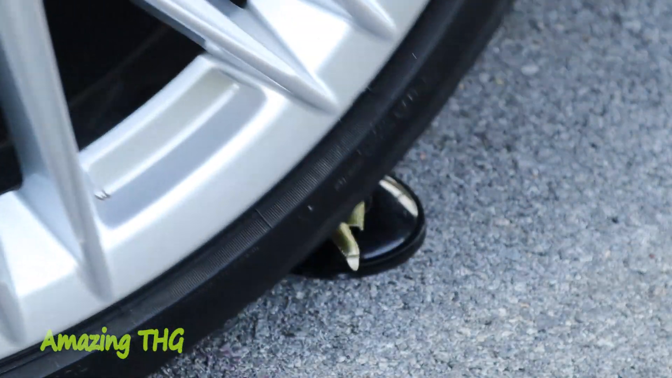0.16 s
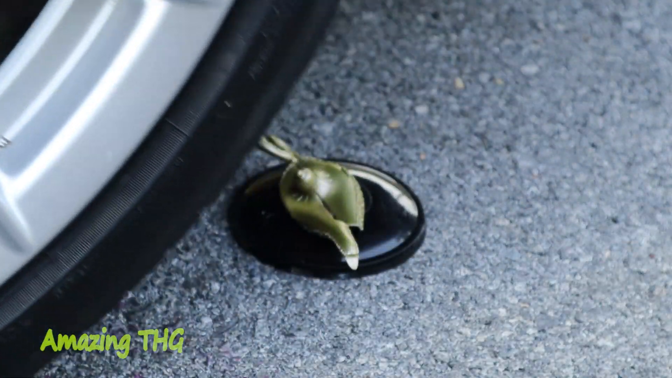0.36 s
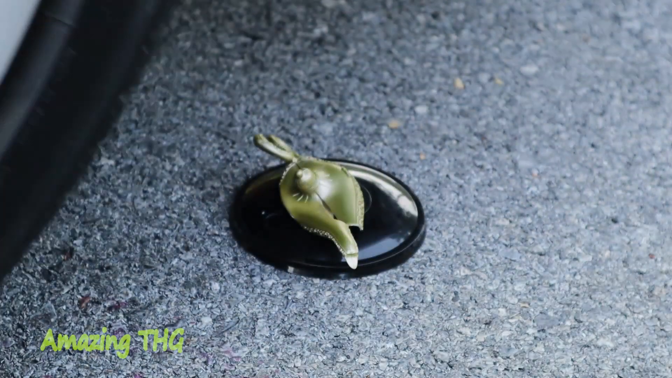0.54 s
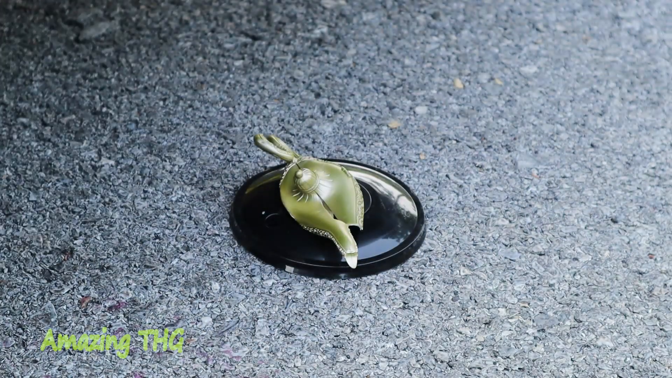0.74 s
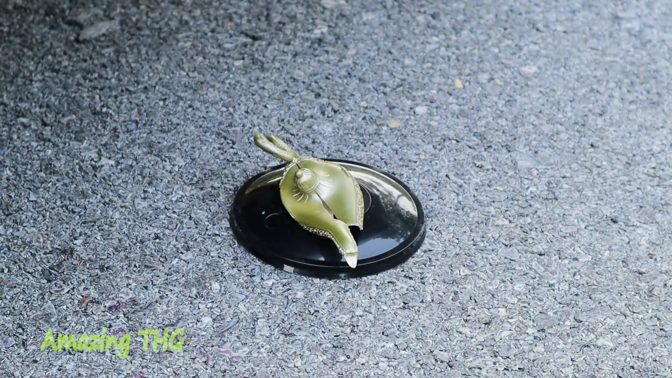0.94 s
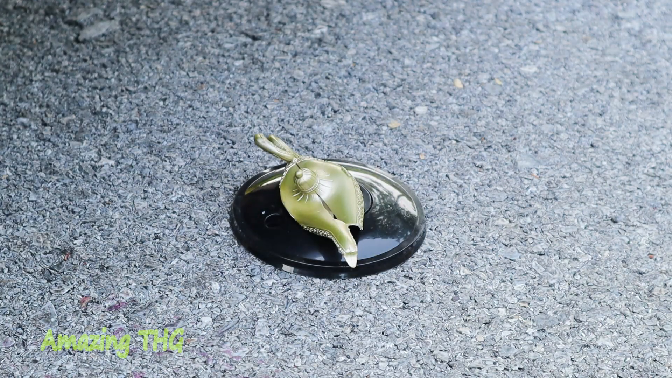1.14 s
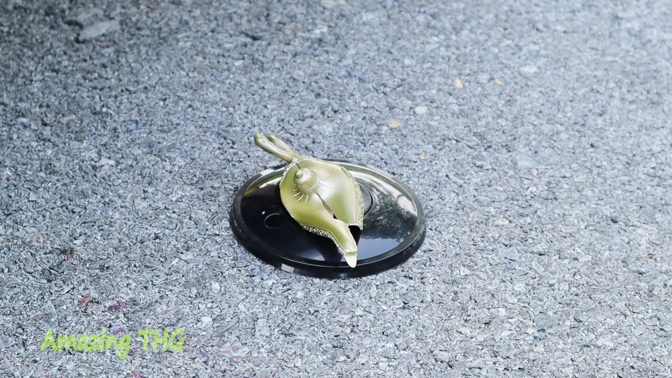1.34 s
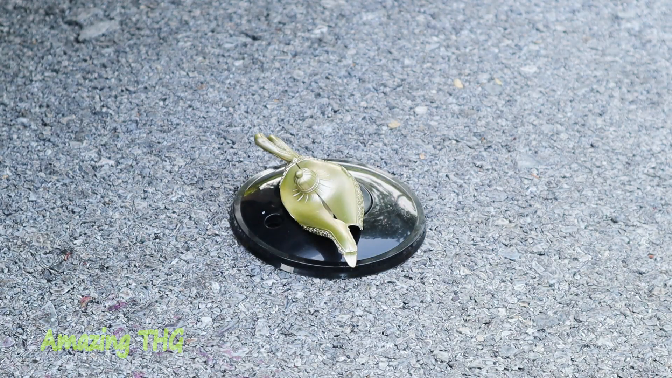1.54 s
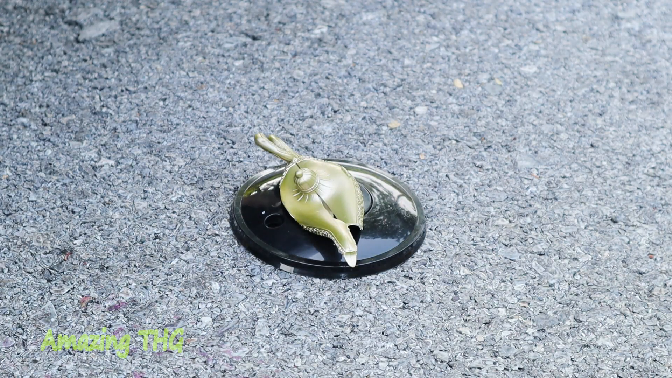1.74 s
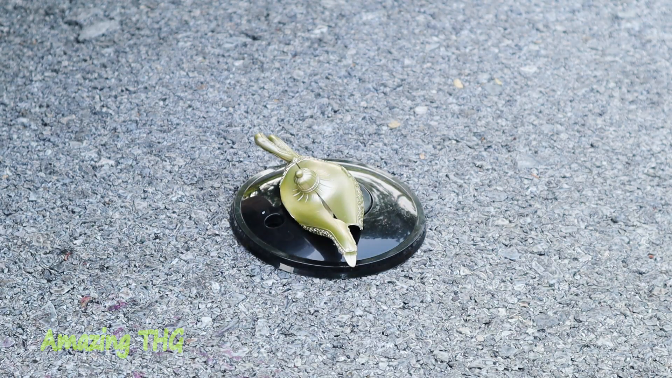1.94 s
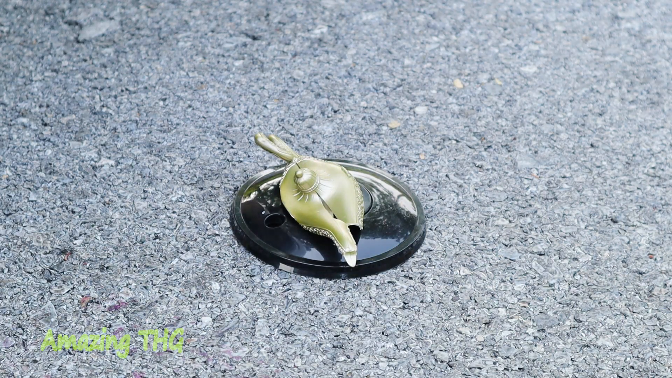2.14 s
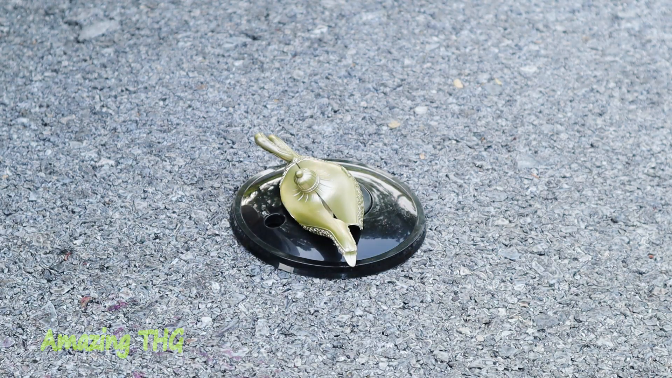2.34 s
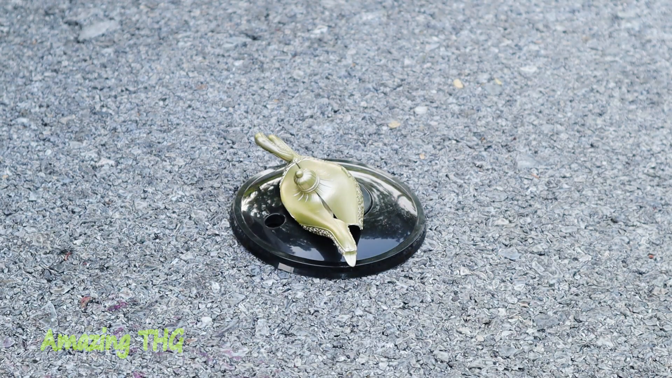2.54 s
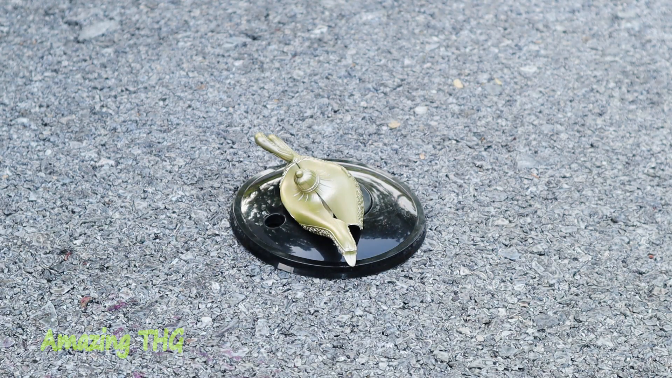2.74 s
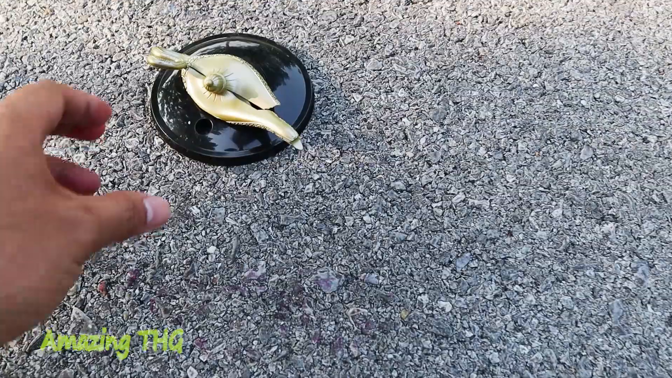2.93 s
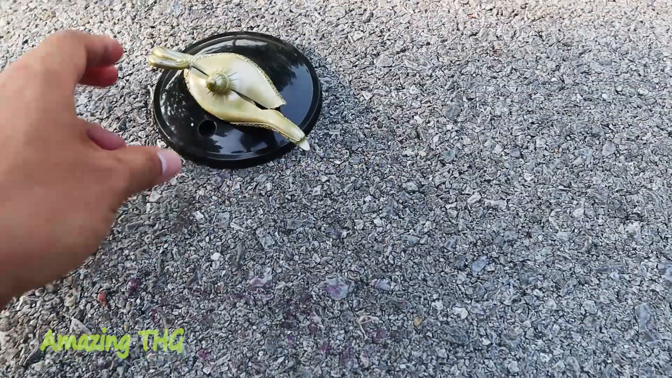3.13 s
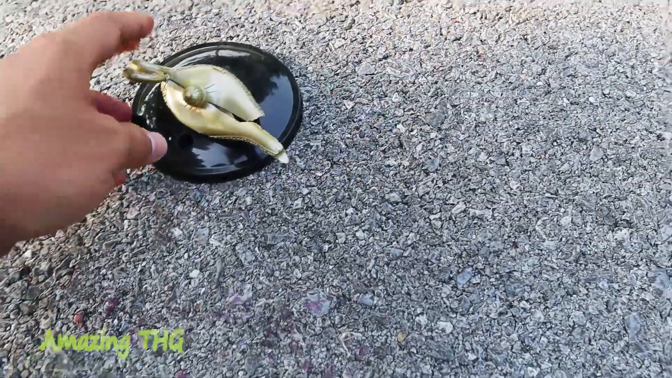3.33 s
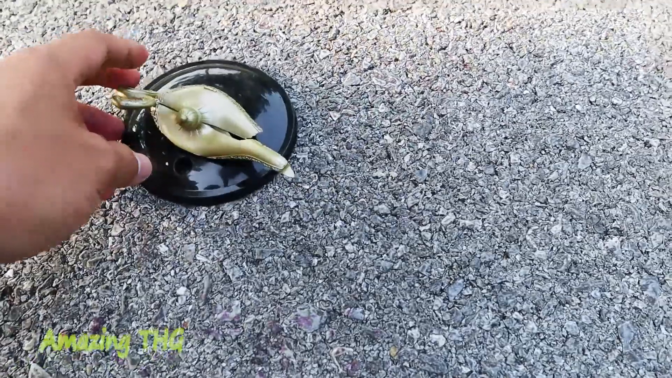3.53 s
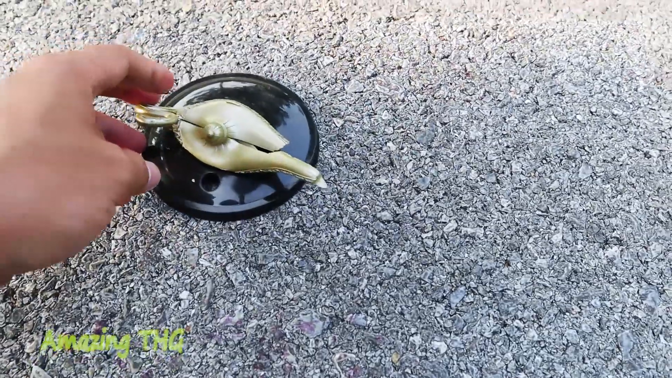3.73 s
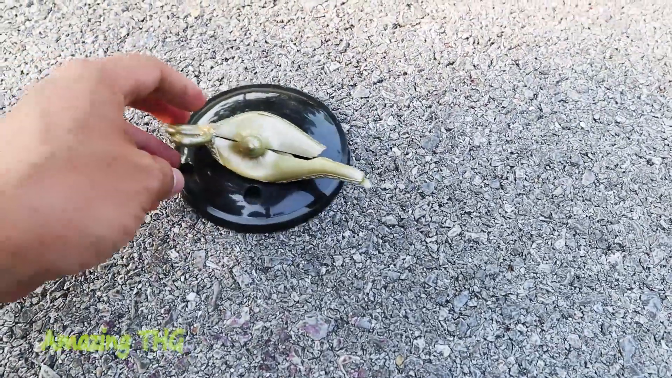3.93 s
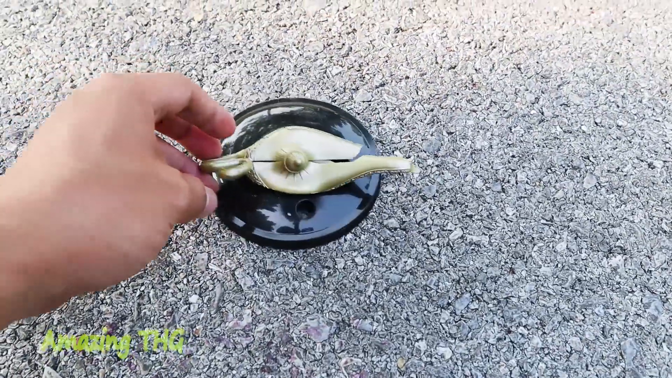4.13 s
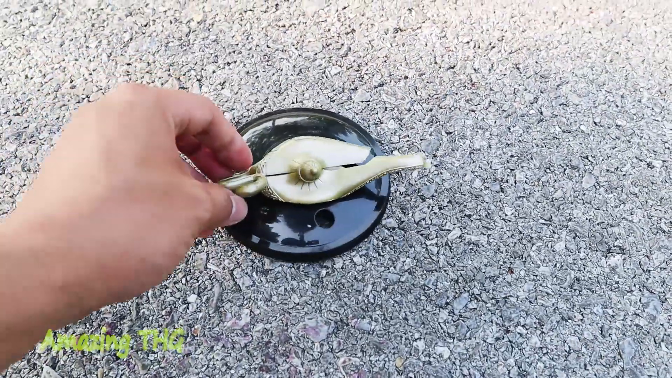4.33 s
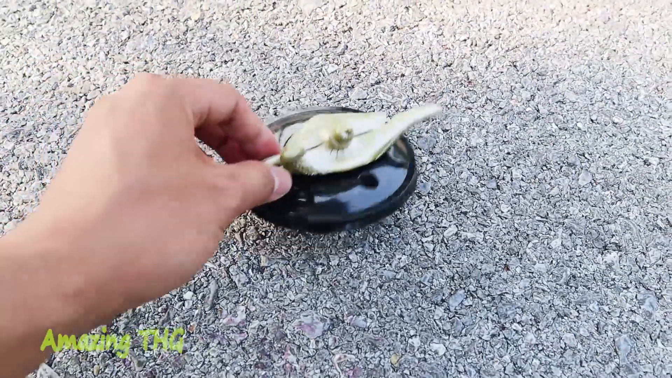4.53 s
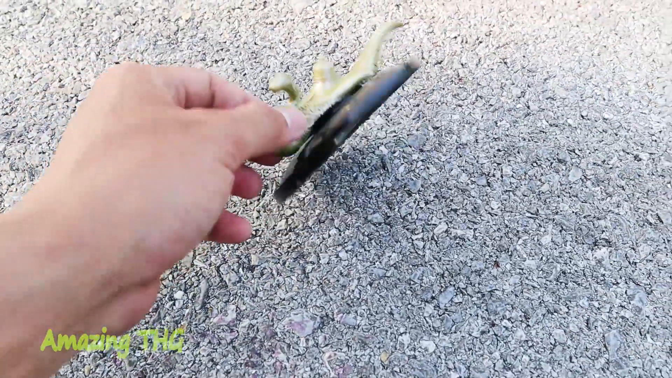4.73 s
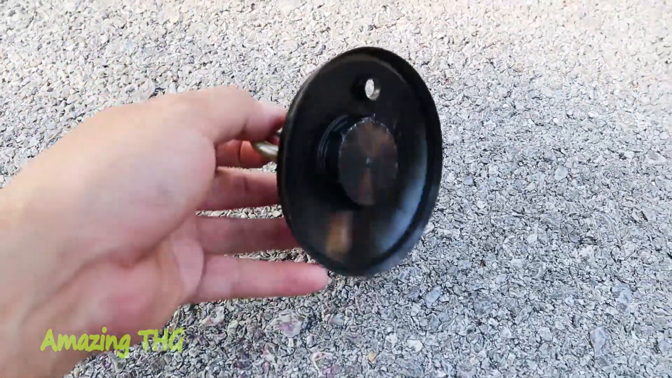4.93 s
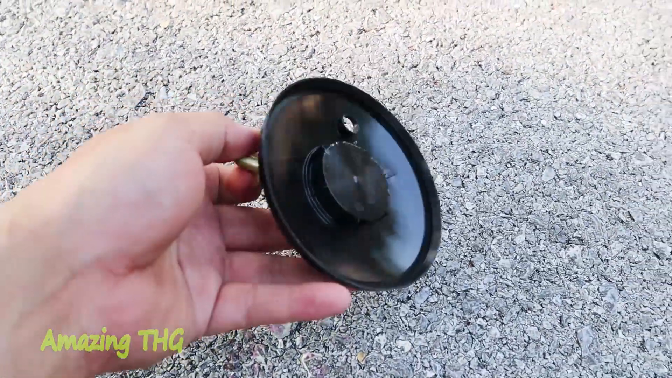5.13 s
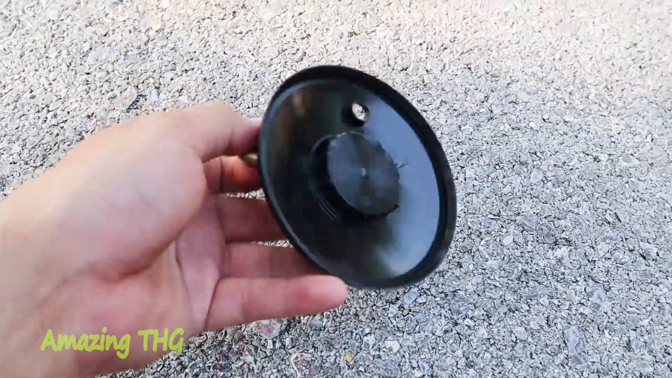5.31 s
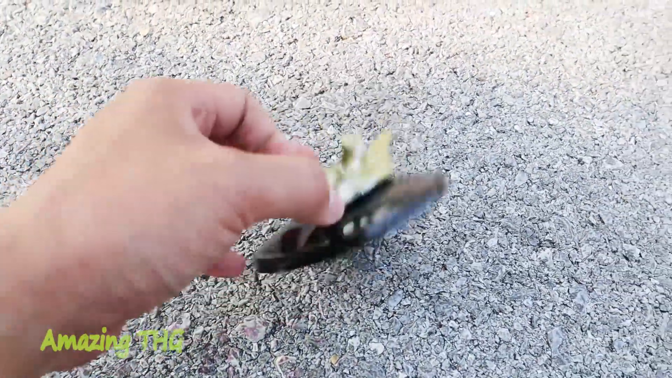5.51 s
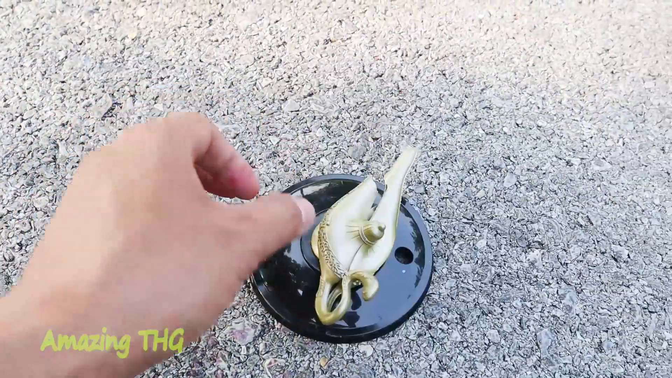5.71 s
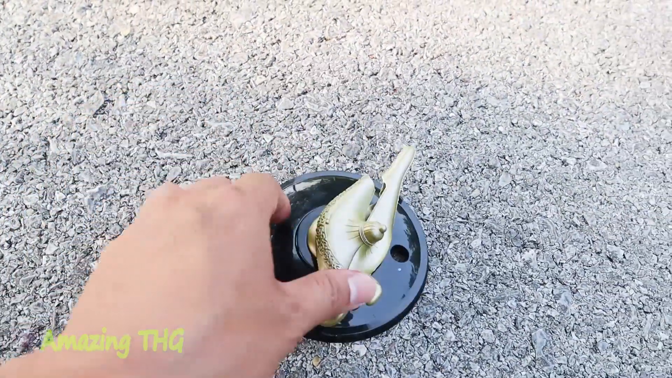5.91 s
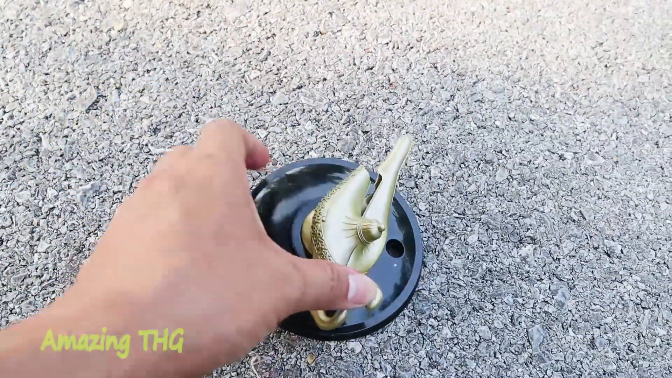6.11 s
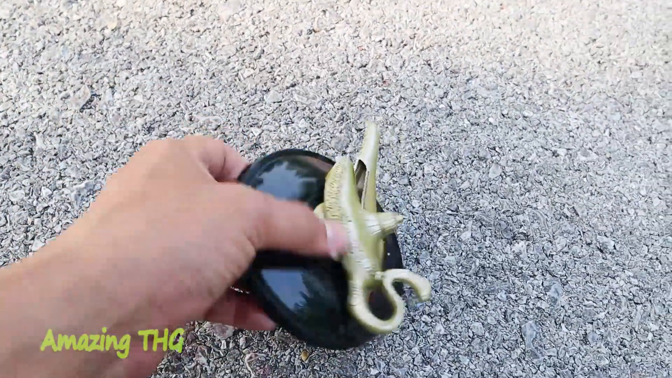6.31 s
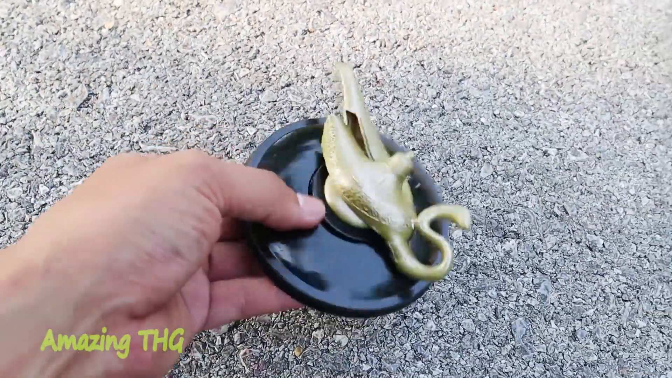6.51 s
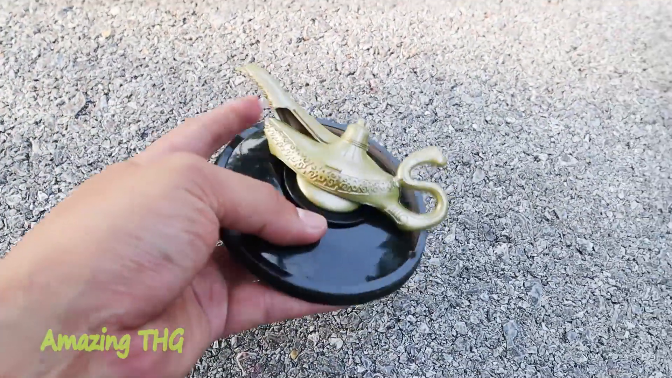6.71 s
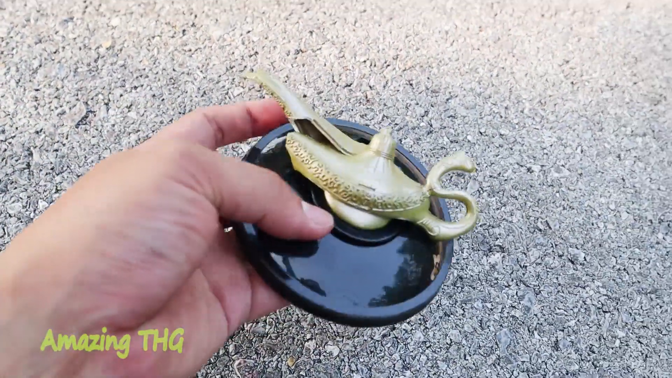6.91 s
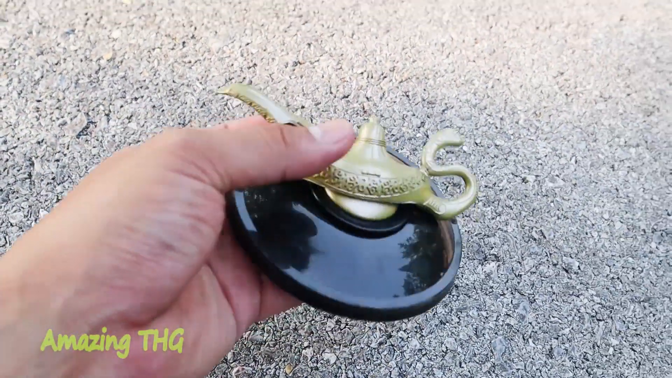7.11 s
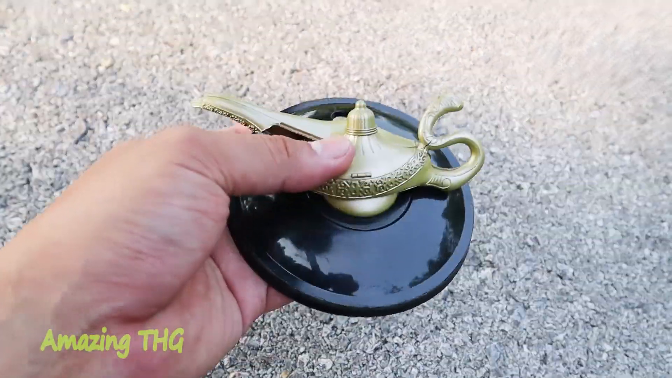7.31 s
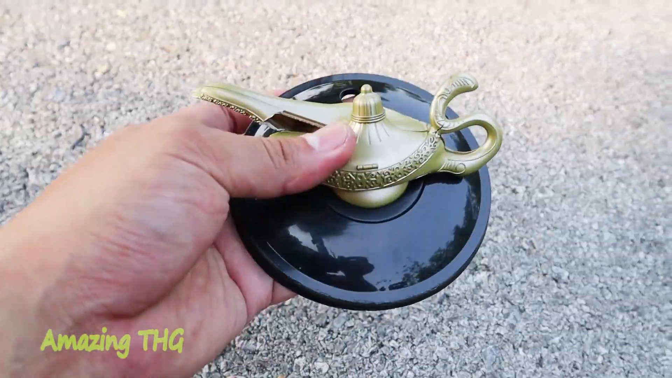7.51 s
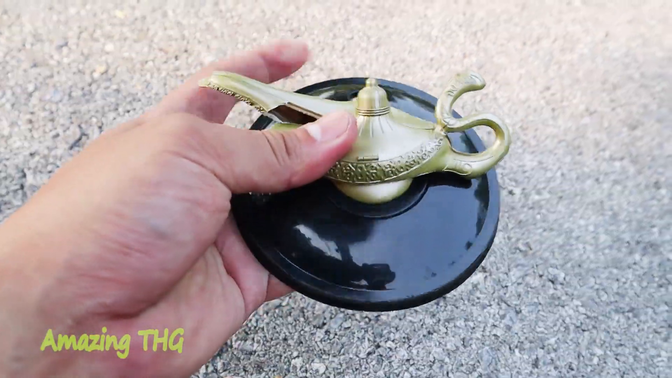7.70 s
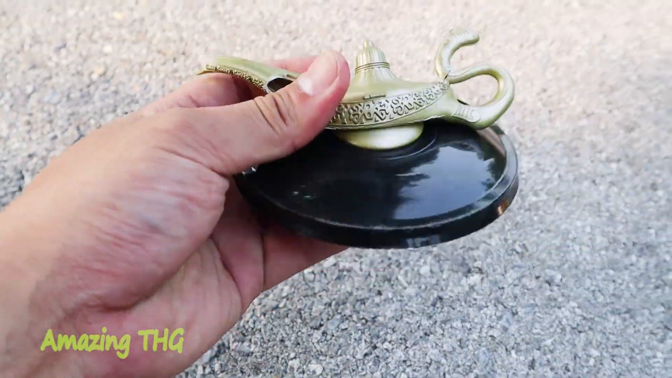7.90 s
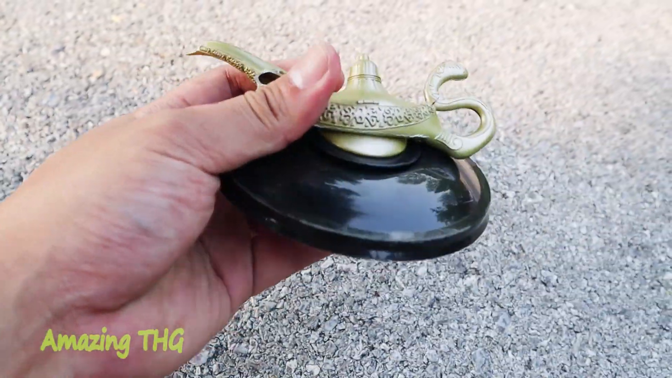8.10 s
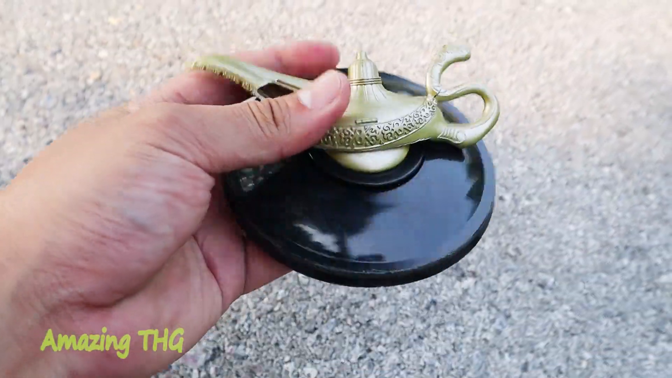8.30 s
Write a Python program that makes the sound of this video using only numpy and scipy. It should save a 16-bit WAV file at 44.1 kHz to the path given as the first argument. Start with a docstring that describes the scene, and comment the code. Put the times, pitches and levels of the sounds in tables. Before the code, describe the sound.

Outdoors on asphalt, heard close and dry. A small strained click opens, and at about 0.13 s a pinned plastic base snaps free with a very loud, sharp crack and short echo, rattling out by 0.25 s. Low-level tyre noise recedes while a soft engine idle chugs about 24 times a second with faint hum and whine, cutting abruptly near 3 s. Only faint airy hiss remains. A tick at 3.45 s begins uneven gritty scrapes and hollow knocks until 4.55 s, then brighter edge skips as the toy lifts, ending around 4.85 s. After a quiet pause, two clacks at 5.63 s precede the loudest hit at 5.7 s, with rapid shrinking bounces. Brief knocks and scraping come at 5.97 and 6.2-6.4 s. Soft skin rubs, tiny squeaks and sparse clicks follow, the clearest a bright double click at 7.79 s, then a small chirp at 7.95 s and a last faint tick at 8.33 s.

```python
"""A plastic toy lamp's lid-shaped base snaps free from under a car tyre and rattles; the engine idles.
Once the car sound ends, in quiet outdoor air, a hand drags the toy round on the asphalt, lifts it,
clacks it down, picks it up again and turns it over, with small rubs and clicks.
Contacts are filtered pushes with chatter, base ring and echo; drags and rubs are filtered grain trains;
the car and air are filtered noise, and the engine adds sines locked to the firing rate."""
import sys
import numpy as np
from scipy import signal
from scipy.fft import rfft, irfft, next_fast_len
from scipy.io import wavfile
from scipy.ndimage import map_coordinates

SR = 44100
rng = np.random.default_rng(int(sys.argv[2]) if len(sys.argv) > 2 else 0)


def generate_wav(signal):
    """Clip the signal to [-1, 1] and save it as 16-bit WAV at the path in sys.argv[1]."""
    frames = np.transpose(np.atleast_2d(signal))
    scaled = np.clip(frames, -1, 1) * 32767
    pcm = np.round(scaled).astype(np.int16)
    wavfile.write(sys.argv[1], SR, pcm)


N = 368235
T = np.arange(N) / SR


def amp(db):
    """Decibels to gain."""
    return 10 ** (np.asarray(db) / 20)


def unit(x):
    """Scale to rms 1."""
    return x / np.sqrt(np.mean(x ** 2) + 1e-20)


def fade(t, t60_s):
    """Exponential decay: 60 dB in t60_s."""
    return np.exp(-np.log(1000) * t / t60_s)


def curves(rows):
    """Interpolate each column after the time to one value per sample."""
    t_s, *columns = np.transpose(rows)
    return [np.interp(T, t_s, column) for column in columns]


def wobble(rate_hz):
    """Smooth random curve with rate_hz knots per second."""
    knots = rng.standard_normal(int(N * rate_hz / SR) + 4)
    return map_coordinates(knots, [T * rate_hz])


def coloured(x, spectrum):
    """Minimum-phase (causal) filter through the spectrum points, via the folded cepstrum."""
    m = 2 * next_fast_len(len(x) // 2 + 2048)
    f_hz, level_db = np.transpose(spectrum)
    log_f = np.log(np.fft.rfftfreq(m, 1 / SR) + 1)
    log_gain = np.log(amp(np.interp(log_f, np.log(f_hz), level_db)))
    cepstrum = irfft(log_gain, m)
    cepstrum[1:m // 2] *= 2
    cepstrum[m // 2 + 1:] = 0
    response = np.exp(rfft(cepstrum))
    return irfft(rfft(x, m) * response, m)[:len(x)]


def noise(spectrum):
    """Coloured noise of rms 1."""
    return unit(coloured(rng.standard_normal(N), spectrum))


def grains(rate_hz, spread_db):
    """Random tiny impacts of uneven size, rms 1."""
    present = rng.random(N) < rate_hz / SR
    size = amp(spread_db * np.clip(rng.standard_normal(N), -2, 2))
    return unit(present * size * rng.choice([-1, 1], N))


def strokes(rows, attack_s, release_s):
    """Gain of hand strokes: each rises, holds while it swells or eases, and dies away."""
    gain = np.zeros(N)
    for start_s, length_s, level_db, swell_db in rows:
        progress = np.clip((T - start_s) / length_s, 0, 1)
        rise = fade(np.maximum(start_s - T, 0), attack_s)
        fall = fade(np.maximum(T - start_s - length_s, 0), release_s)
        gain = np.maximum(gain, amp(level_db + swell_db * (progress - .5)) * rise * fall)
    return gain


# base ring modes, before random detuning: (f/Hz, relative level/dB, t60/s)
BASE_MODES = [(790, -23.5, .03), (970, -11, 0.034), (1170, -3, 0.041), (1630, -2.5, 0.018),
              (1890, -0.5, 0.0083), (2166, 1, 0.016), (3720, -6.5, 0.032), (5430, -3, 0.0094)]
# bright crack of a hard contact: (f/Hz, relative level/dB)
CRACK_SPECTRUM = [(150, -55), (500, -36), (2500, -18.5), (3700, 2), (4400, 3.5), (5200, 1), (6800, -4.5),
                  (9500, -18), (13000, -19), (16000, -34)]


def contacts(rows, body, chatter_db, chatter_t60_s, ring_db, crack_offset_db, echo_db, echo_t60_s):
    """Each contact is a sharp push and a brief chatter; the base rings and nearby surfaces answer."""
    out, t = np.zeros(N + SR), np.arange(SR // 5) / SR

    def sized(x, db):
        """Scale to the given energy."""
        return amp(db) * x / np.linalg.norm(x)

    for t_s, peak_db, crack_db in rows:
        ring = np.zeros(len(t))
        for f_hz, level_db, t60_s in BASE_MODES:
            gain = amp(level_db + rng.normal(0, 2))
            ring += gain * fade(t, t60_s) * np.cos(2 * np.pi * f_hz * rng.normal(1, 0.018) * t)
        chatter = rng.standard_normal(len(t)) * fade(t, chatter_t60_s)
        echo = rng.standard_normal(len(t)) * fade(t, echo_t60_s)
        blow = sized(ring, ring_db) + sized(chatter, chatter_db) + sized(echo, echo_db)
        blow[0] += 1  # the push
        # crack never exceeds the body's energy
        crack = sized(coloured(blow, CRACK_SPECTRUM), min(crack_db + crack_offset_db, 0))
        hit = sized(coloured(blow, body), 0) + crack
        out[round(t_s * SR):][:len(t)] += amp(peak_db) * hit / np.abs(hit).max()
    return out[:N]


# car moving off: (t/s, tyre level/dB, chuff level/dB)
CAR_LEVELS = [(0, -56, -70), (.35, -56, -70), (1.2, -62, -60.5), (1.5, -64.5, -58), (2.5, -67.5, -54),
              (2.9, -67.5, -55)]
# slightly wandering idle: (t/s, firings so far)
FIRINGS = [(0, 0), (1.272, 30), (1.601, 38), (2.281, 54), (2.733, 65), (2.97, 71)]
# engine hum: (multiple of firing rate, rms level/dB)
ENGINE_ORDERS = [(2, -83), (3, -71), (4, -81.5), (5, -78.5)]
# belt-driven accessories: (multiple of firing rate, peak level/dB)
ACCESSORY_WHINE = [(9.95, -80), (13.1, -72.5), (26.45, -77.5)]
# tyre, chuff, rumble: (f/Hz, relative level/dB)
TYRE_SPECTRUM = [(59, -37), (100, -3.5), (210, -16.5), (313, -3.5), (353, -10), (631, -3), (803, -8.5),
                 (2020, -4.5), (2190, -8.5), (3330, -14), (5390, -27), (12000, -35), (15600, -63),
                 (22000, -120)]
CHUFF_SPECTRUM = [(200, -29.5), (650, -10.5), (850, 2.5), (1030, 5), (1300, -6), (1600, -12.5), (1900, -7),
                  (2400, -22.5), (3200, -20.5), (3800, -35.5), (6000, -43.5), (12000, -63.5)]
RUMBLE_SPECTRUM = [(60, -27.5), (170, -14), (235, -5.5), (270, -7.5), (318, 0), (380, -8.5), (500, -9.5),
                   (1500, -35), (8000, -74)]
CAR_END_S, CAR_FADE_S = 2.96, 0.0023


def car():
    """Tyre noise recedes; the idling engine hums and chuffs once a firing, plainly once the wheel has passed."""
    tyre_db, chuff_db = curves(CAR_LEVELS)
    turns = curves(FIRINGS)[0]
    beat = unit(amp(7.3 * np.cos(2 * np.pi * turns) + 1 * wobble(22)))
    chuff = amp(chuff_db) * beat * noise(CHUFF_SPECTRUM)
    hum = np.zeros(N)
    for order, level_db in ENGINE_ORDERS:
        phase = 2 * np.pi * (round(order) * turns + rng.random())
        hum += amp(level_db + 1 * wobble(4)) * np.sqrt(2) * np.sin(phase)
    whine = np.zeros(N)
    for order, level_db in ACCESSORY_WHINE:
        phase = 2 * np.pi * order * turns + .7 * wobble(25)
        whine += amp(level_db + 2 * wobble(20)) * np.sin(phase)
    tyre = amp(tyre_db + 0.76 * wobble(44)) * noise(TYRE_SPECTRUM)
    rumble = amp(-70.0 + 0.63 * wobble(9.1)) * noise(RUMBLE_SPECTRUM)
    gate = np.clip((CAR_END_S - T) / CAR_FADE_S + 1, 0, 1)
    return (tyre + chuff + hum + whine + rumble) * gate


# outdoor air: (f/Hz, relative level/dB)
AIR_SPECTRUM = [(20, -22), (60, -7), (100, -5), (180, -5), (400, -5.5), (800, 0), (1250, -1.5), (2000, -4),
                (2600, -11), (4000, -16), (8000, -19), (16000, -20)]
AIR_DB = -67


def air():
    """Faint outdoor background: coloured noise with a slightly wavering level."""
    return amp(AIR_DB + 0.36 * wobble(4.7)) * noise(AIR_SPECTRUM)


# base straining and springing out from under the tyre: (t/s, peak level/dB, crack before offset/dB)
SNAPS = [(.001, -28.5, -8.5), (.045, -46.5, -16), (.116, -37, -13.5), (.12, -38.5, -10.5),
         (.1322, -22.5, -36.5), (.1345, -5, -14.5), (.142, -19, -20.5)]
# body of the pinned base: (f/Hz, relative level/dB)
PINNED_SPECTRUM = [(100, -49.5), (300, -31), (600, -8.5), (820, -14.5), (960, -1.5), (1100, -13),
                   (1300, -7), (1480, -3), (1750, -0.5), (2150, -20.5), (2650, -5.5), (3300, -24),
                   (3800, -11.5), (5000, -35), (16000, -59.5)]


def snaps():
    """The pinned base strains and springs free in sharp contacts with a long echo."""
    return contacts(SNAPS, PINNED_SPECTRUM, chatter_db=5.5, chatter_t60_s=0.027, ring_db=-16.5,
                    crack_offset_db=3.5, echo_db=-5.0, echo_t60_s=0.1)


BOUNCE_SHRINK, BOUNCE_LOSS_DB = .85, 5.2  # flight ratio, level loss per bounce
REBOUND_CRACK_DB = 8.5  # rebounds hit with the hard edge and crack more brightly


def bounces(t_s, peak_db, flight_s, crack_db, count):
    """Contact rows of one fall: each bounce is weaker and each flight shorter than the last."""
    rows = []
    for k in range(count):
        rows.append((t_s, peak_db - BOUNCE_LOSS_DB * k, crack_db + REBOUND_CRACK_DB * (k > 0)))
        t_s = t_s + flight_s * BOUNCE_SHRINK ** k
    return rows


# free toy falling on its rim, after the snap and when set down:
# (t/s, first peak level/dB, first flight/s, contact count, first crack before offset/dB)
DROPS = [(.18, -35, .003, 2, -35), (.1875, -34, .003, 2, -35), (.195, -26, .003, 5, -38),
         (.2215, -29, .003, 3, -33), (5.6266, -16, 0, 1, -23), (5.6312, -15, 0, 1, -13.5),
         (5.652, -31, .0065, 3, -17), (5.7037, 0, .012, 6, -28.5), (5.7608, -26, .003, 2, -46),
         (5.769, -19, 0, 1, -41), (5.776, -30, .003, 2, -42), (5.798, -42, .004, 2, -38)]
# body of the free shell: (f/Hz, relative level/dB)
SHELL_SPECTRUM = [(100, -62.5), (350, -37), (700, -17.5), (1100, -13.5), (1580, 0.5), (2100, -5.5),
                  (2600, -17), (3200, -25.5), (5000, -63), (16000, -77.5)]


def falls():
    """The free toy drops on its rim and rattles in shrinking bounces."""
    rows = []
    for t_s, peak_db, flight_s, count, crack_db in DROPS:
        rows += bounces(t_s, peak_db, flight_s, crack_db, count=round(count))
    return contacts(rows, SHELL_SPECTRUM, chatter_db=0.5, chatter_t60_s=0.017, ring_db=-12,
                    crack_offset_db=2.5, echo_db=-17, echo_t60_s=.05)


# fingers and nails ticking on the toy: (t/s, peak level/dB, crack before offset/dB)
TICKS = [(3.4545, -36, -20.5), (6.838, -46, -20), (7.3565, -41, -34), (7.3675, -54, -36),
         (7.5445, -43, -37), (7.7887, -28.5, -3), (7.79, -23.5, -13.5), (7.9495, -43, -31),
         (8.3265, -49.5, -24)]
# body of the held toy: (f/Hz, relative level/dB)
HELD_SPECTRUM = [(100, -44), (380, -33), (620, 2.5), (900, -4), (1400, 2.5), (1750, -0.5), (2100, 4.5),
                 (2600, 0), (3300, -10.5), (4300, -3.5), (8000, -28.5), (16000, -34)]


def ticks():
    """Fingers and nails strike the held shell."""
    return contacts(TICKS, HELD_SPECTRUM, chatter_db=4, chatter_t60_s=0.022, ring_db=-18,
                    crack_offset_db=5, echo_db=-22, echo_t60_s=0.045)


def stuck(rows, hold_s, dip_db):
    """The rim sticks on a stone and dips in level just before it jumps free."""
    return amp(dip_db * sum((T > t_s - hold_s) & (T < t_s) for t_s, *_ in rows))


# pushes sliding the rim over asphalt: (start t/s, length/s, mid level/dB, swell start to end/dB)
DRAGS = [(3.495, 0.081, -40, 2.5), (3.642, 0.056, -39, 6), (3.71, 0.052, -49.5, -7),
         (3.768, 0.051, -39.5, -1), (3.835, 0.114, -47, -1), (3.945, .2, -36.5, 2), (4.16, .18, -41.5, -3),
         (4.365, 0.16, -49.5, 5.5), (4.555, .085, -56.5, 27), (4.655, .12, -36, 7.5),
         (4.78, 0.04, -42, 5.5), (5.964, .003, -47.5, 1), (6.005, 0.0047, -48.5, -6),
         (6.224, 0.0058, -37.5, 4), (6.283, 0.01, -54, -13), (6.329, 0.019, -28.5, 1.5),
         (6.365, .07, -46.5, -10)]
# rim flat on grit, rim on edge, cracking sand: (f/Hz, relative level/dB)
GRIT_SPECTRUM = [(120, -79), (200, -46), (412, -30.5), (467, -20.5), (946, -2.5), (1200, -2), (1660, 6),
                 (2250, -3.5), (3010, -23), (3470, -20.5), (4810, -29), (5360, -37), (7150, -33.5),
                 (9050, -48), (15000, -83)]
EDGE_SPECTRUM = [(100, -40), (350, -37), (500, -21.5), (900, -13), (1300, -6.5), (1600, 0), (2200, 0.5),
                 (2500, -11.5), (2800, -21), (3400, -21), (4400, -38.5), (5400, -32.5), (9000, -49),
                 (16000, -79)]
SAND_SPECTRUM = [(500, -55), (2500, 16), (3500, 1), (5400, 4), (7000, -5), (9000, -18.5), (16000, -40)]
DRAG_ATTACK_S, DRAG_RELEASE_S = 0.03, 0.063  # 60 dB times
EDGE_START_S, EDGE_END_S = 4.56, 5  # toy slides on its edge


def drag():
    """The rim sticks and skips over grit; catches sound the hollow base, higher when it stands on its edge."""
    # each catch frees a burst of chatter that dies within milliseconds
    impacts = grains(rate_hz=750, spread_db=3.5)
    energy = signal.fftconvolve(impacts ** 2, fade(T[:1000], t60_s=.0035))[:N]
    catches = unit(np.sqrt(np.abs(energy)) * rng.standard_normal(N))
    catches = catches * stuck([*KNOCKS, *SKIPS], hold_s=.009, dip_db=-9)
    flat = unit(coloured(catches, GRIT_SPECTRUM))
    edge = amp(2.0) * unit(coloured(catches, EDGE_SPECTRUM))
    body = np.where((T > EDGE_START_S) & (T < EDGE_END_S), edge, flat)
    # sand grains crack brightly under the rim
    sand = amp(-26.5) * unit(coloured(grains(rate_hz=92, spread_db=4.5), SAND_SPECTRUM))
    return strokes(DRAGS, DRAG_ATTACK_S, DRAG_RELEASE_S) * (body + sand)


# flat rim catching on larger stones: (t/s, peak level/dB, crack before offset/dB)
KNOCKS = [(3.515, -28.5, -30), (3.569, -25.5, -32), (3.643, -34, -27), (3.682, -24, -18), (3.691, -35, -24),
          (3.804, -31, -24), (3.872, -24, -19), (3.971, -28, -18), (3.993, -26.5, -17),
          (4.023, -28.5, -14.5), (4.041, -33, -14), (4.07, -21, -15.5), (4.106, -28, -20),
          (4.141, -24, -18), (4.163, -22.5, -28), (4.194, -26.5, -20), (4.289, -25, -31),
          (4.343, -26.5, -31), (4.449, -27, -30), (4.512, -25, -27.5), (5.965, -24, -18.5),
          (6.009, -35.5, -23), (6.326, -19.5, -25), (6.342, -19, -29), (6.35, -17, -22), (6.383, -26, -19),
          (6.4, -34.5, -24)]


def knocks():
    """The flat rim catches on the larger stones and sounds the base."""
    return contacts(KNOCKS, GRIT_SPECTRUM, chatter_db=0, chatter_t60_s=.014, ring_db=-14,
                    crack_offset_db=-2, echo_db=-26, echo_t60_s=.04)


# tilted rim skipping on its edge as it is lifted: (t/s, first peak level/dB)
SKIPS = [(4.6363, -21.5), (4.669, -21), (4.7206, -19.5), (4.7466, -12.5), (4.7597, -12), (4.7906, -22),
         (4.825, -32), (4.836, -25.5)]
SKIP_FLIGHT_S, SKIP_CRACK_DB = .0045, -25.5  # crack: first landing, before offset


def skips():
    """The tilted rim skips on its edge; each skip lands once more after a short flight."""
    rows = []
    for t_s, peak_db in SKIPS:
        rows += bounces(t_s, peak_db, SKIP_FLIGHT_S, SKIP_CRACK_DB, count=2)
    return contacts(rows, EDGE_SPECTRUM, chatter_db=-2, chatter_t60_s=.011, ring_db=-16,
                    crack_offset_db=-4, echo_db=-26, echo_t60_s=.04)


# skin and rim squeaking: (centre t/s, half-length/s, centre f/Hz, level/dB)
SQUEAKS = [(4.705, 0.055, 5400, -66), (6.47, 0.015, 2430, -55.5), (6.62, 0.025, 2540, -57),
           (7.951, 0.015, 1987, -46.5), (7.98, 0.017, 1990, -60)]


def squeaks():
    """Short, rough stick-slip chirps that rise a little."""
    out = np.zeros(N)
    rough = unit(wobble(700))
    for t_s, half_s, f_hz, level_db in SQUEAKS:
        u = np.clip((T - t_s) / half_s, -1, 1)
        pitch_hz = f_hz * (1 + .04 * u)
        tone = np.sin(2 * np.pi * np.cumsum(pitch_hz) / SR)
        out += amp(level_db) * (1 - u * u) ** 2 * rough * tone
    return out


# hollow lamp against hand and ground: (t/s, peak level/dB)
PATS = [(5.6265, -39.5), (5.6525, -41), (7.3565, -42.5)]
# body of the hollow lamp: (f/Hz, relative level/dB)
HOLLOW_SPECTRUM = [(80, -26), (300, -8.5), (530, 7.5), (900, -6.5), (3000, -47), (16000, -73.5)]
PAT_CRACK_DB = -46


def pats():
    """The hollow lamp thumps softly against hand and ground."""
    rows = [(t_s, peak_db, PAT_CRACK_DB) for t_s, peak_db in PATS]
    return contacts(rows, HOLLOW_SPECTRUM, chatter_db=-3, chatter_t60_s=.015, ring_db=-14,
                    crack_offset_db=0, echo_db=-24, echo_t60_s=.04)


# fingers sliding on plastic: (start t/s, length/s, mid level before trim/dB, swell start to end/dB)
RUBS = [(6.228, .01, -46.5, -1.5), (6.61, 0.04, -54.5, -7.5), (6.757, 0.019, -56, -1),
        (6.845, 0.091, -59, -19.5), (7.348, 0.0076, -50, 11), (7.9, 0.063, -57.5, -16)]
# skin on plastic: (f/Hz, relative level/dB)
SKIN_SPECTRUM = [(180, -67), (300, -21), (649, -1), (1450, 5), (1660, 2), (2030, 5), (2410, -2.5),
                 (2950, -3), (4010, -13), (12000, -31), (15600, -61), (22000, -120)]
RUB_ATTACK_S, RUB_RELEASE_S = 0.066, 0.071  # 60 dB times
RUB_TRIM_DB = -2.5


def rub():
    """Fingers slide on the plastic in fine, dense slips."""
    slips = unit(coloured(grains(rate_hz=3700, spread_db=7), SKIN_SPECTRUM))
    return amp(RUB_TRIM_DB) * strokes(RUBS, RUB_ATTACK_S, RUB_RELEASE_S) * slips


def scene():
    """The snap under the car, then the handling of the toy, over faint air."""
    handling = ticks() + drag() + knocks() + skips() + squeaks() + pats() + rub()
    return (car() + air() + snaps() + falls() + handling)[None]


BAND_LIMIT_HZ = 15800


def record(dry):
    """The microphone overloads at full scale and keeps nothing above its band limit."""
    m = next_fast_len(N + SR // 2)
    passband = np.fft.rfftfreq(m, 1 / SR) < BAND_LIMIT_HZ
    clipped = np.clip(dry, -1, 1)
    return irfft(rfft(clipped, m) * passband, m)[:, :N]


dry = scene()
out = record(dry)
generate_wav(out)
```